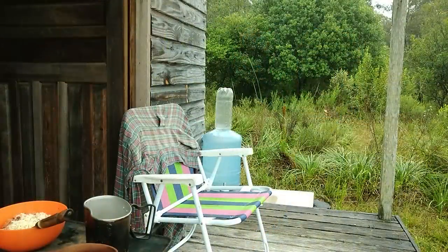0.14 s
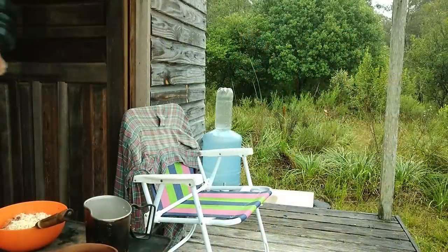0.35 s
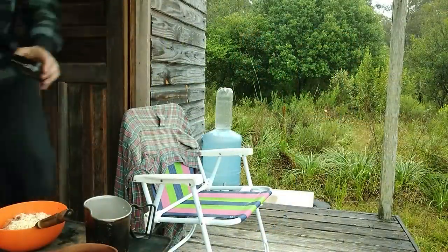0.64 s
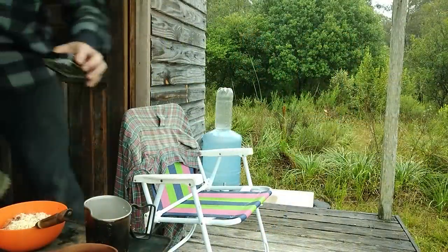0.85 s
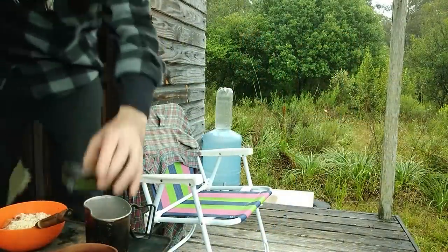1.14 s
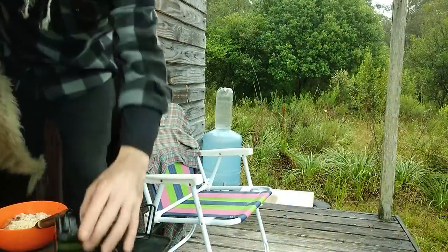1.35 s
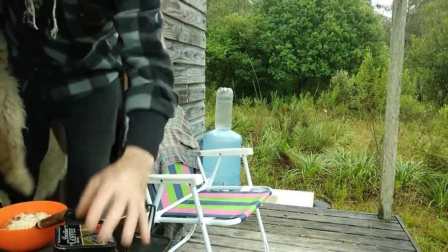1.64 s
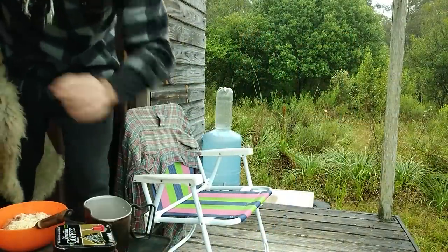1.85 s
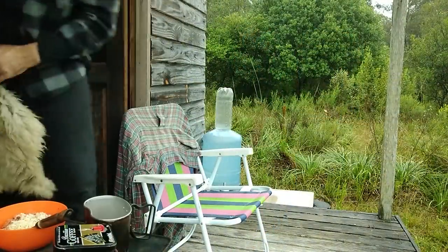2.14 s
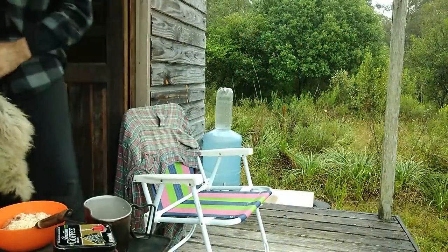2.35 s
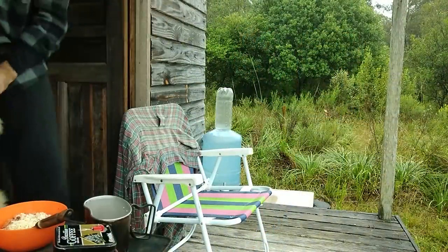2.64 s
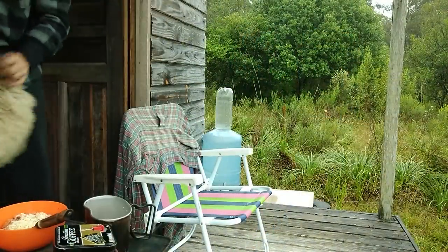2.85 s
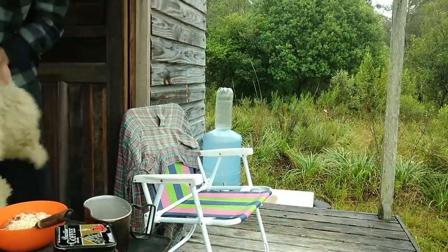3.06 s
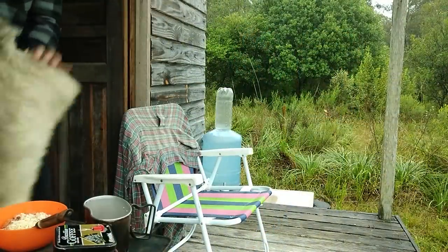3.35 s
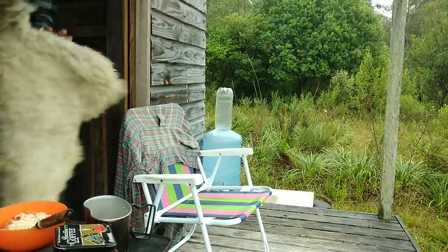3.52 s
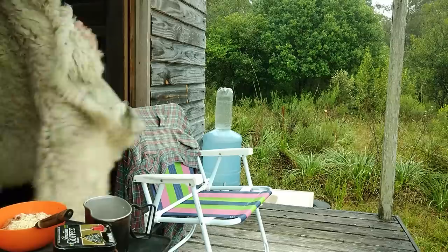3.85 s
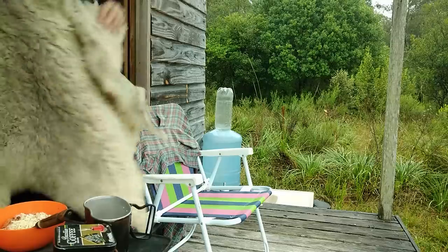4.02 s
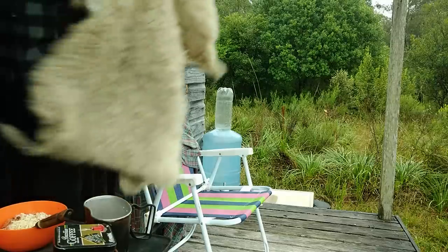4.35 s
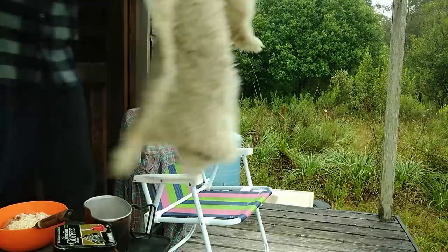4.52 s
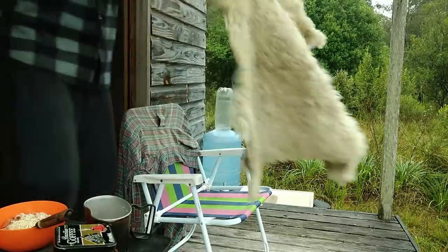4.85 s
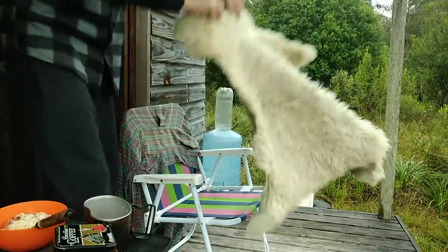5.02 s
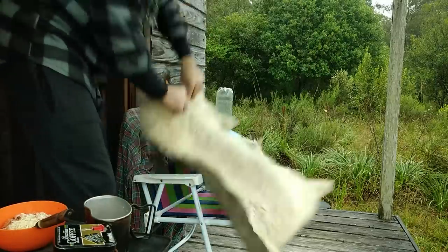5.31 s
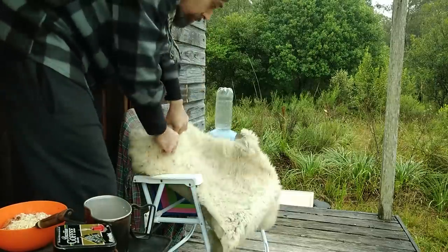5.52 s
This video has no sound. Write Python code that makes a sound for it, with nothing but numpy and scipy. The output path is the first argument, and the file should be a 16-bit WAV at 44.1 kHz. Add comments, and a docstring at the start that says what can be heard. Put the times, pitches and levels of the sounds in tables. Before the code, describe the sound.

Steady rain hisses on grass and leaves around a wooden porch, with fat drips, soft footsteps and one sharp clack of a small tin.

```python
"""Rain beside a wooden porch

Steady rain hisses on grass and bushes: shaped noise for the merged drops, random ticks and rings for near ones.
Fat drops splat as noise bursts, plop as bubbles rising in pitch, and plink on hollow things.
Someone steps softly over the boards (damped modes under soft blows), claps a small tin down on a table
(ringing modes with a noisy clack) and lays a fleece on a chair (short strokes of band noise)."""
import sys
import numpy as np
from scipy import signal
from scipy.fft import rfft, irfft, next_fast_len
from scipy.io import wavfile
from scipy.ndimage import map_coordinates

SR = 44100
rng = np.random.default_rng(int(sys.argv[2]) if len(sys.argv) > 2 else 0)


def output_pcm(signal):
    """Save a mono or channel-first signal as 16-bit PCM at the path in sys.argv[1].

    Samples are clipped to [-1, 1] before scaling.
    """
    pcm = np.clip(np.atleast_2d(signal).T, -1, 1) * 32767
    wavfile.write(sys.argv[1], SR, np.round(pcm).astype(np.int16))


N = 250488  # samples in the scene


def amp(db):
    """Level law: an amplitude gain is ten to the power dB / 20."""
    return 10 ** (np.asarray(db) / 20)


def unit(x):
    """Power normalization: scale a signal to rms 1."""
    return x / np.sqrt(np.mean(x ** 2) + 1e-20)


def seconds(length):
    """Sampling: the time axis of a sound that lasts this many samples."""
    return np.arange(length) / SR


def along(points, hz):
    """Logarithmic pitch scale: interpolate (Hz, value) points over log frequency."""
    f, v = np.transpose(points)
    return np.interp(np.log(hz + 1), np.log(f + 1), v)


def wobble(rate):
    """Band-limited fluctuation: a smooth curve through random knots, rate of them a second."""
    knots = rng.standard_normal(int(N * rate / SR) + 4)
    return map_coordinates(knots, [np.arange(N) * rate / SR])


def filtered(x, response):
    """Linear filtering: multiply the spectrum by a response given as a function of frequency."""
    n = x.shape[-1]
    m = next_fast_len(n + 8192)
    return irfft(rfft(x, m) * response(np.fft.rfftfreq(m, 1 / SR)), m)[..., :n]


def bump(hz, centre, octaves):
    """Resonance curve: a broad peak, falling to half at the given octaves from its centre."""
    return 1 / (1 + (np.log2((hz + 1) / centre) / octaves) ** 2)


def add(track, s, sound):
    """Superposition: mix a sound into a track from time s in seconds."""
    start = max(round(s * SR), 0)
    part = sound[..., :N - start]
    track[..., start:start + part.shape[-1]] += part


def from_right(pair, lag_ms):
    """Interaural delay: sound from the right reaches the left channel later; a negative lag means left."""
    return filtered(pair, lambda hz: np.exp(np.outer([-1, 1], 1j * np.pi * hz * lag_ms / 1000)))


# Left-right likeness of diffuse sound. Each row: frequency in Hz, correlation from 0 to 1.
LIKENESS = [(100, 0.96), (300, 0.95), (700, 1), (1500, 0.19), (4000, 0.12), (8000, 0.16), (14000, 0.12)]


def spread(pair, spectrum):
    """Diffuse-field coherence: mix two unrelated signals into a coloured, partly alike pair of rms 1."""
    def mid_side(hz):
        turn = np.arccos(np.clip(along(LIKENESS, hz), -1, 1)) / 2
        return amp(along(spectrum, hz)) * [np.cos(turn), np.sin(turn)]

    mid, side = filtered(pair, mid_side)
    return unit(np.array([mid + side, mid - side]))


def patter(count, size_db, tick_db, spray_t60):
    """Random arrivals: drops of uneven size, each a noise tick with a short spray; their powers add."""
    draw = rng.random((count, 2))
    size = amp(size_db * np.minimum(-np.log(1 - draw[:, 1]), 4))
    t = seconds(SR // 8)
    splash = amp(tick_db - 60 * t / 0.0032) + amp(-60 * t / spray_t60)
    hits = np.bincount((draw[:, 0] * N).astype(int), size ** 2, N)
    power = signal.fftconvolve(hits, splash ** 2)[:N]
    return unit(np.sqrt(np.abs(power)) * rng.standard_normal((2, N)))


# Leaves, grass and wood that the rain patters on. Each row: centre frequency in Hz, relative level in dB.
RAINED_SURFACES = [(700, -17), (1500, -12), (3000, -13.5), (4700, -9.5), (6300, -7), (7700, 1.5),
                   (8900, -6.5), (11500, -33.5)]


def leaves(octaves=0.54, surge_db=2.5):
    """Resonant colouring: every surface catches its own drops, in uneven flurries, and filters them."""
    out = np.zeros((2, N))
    for centre_hz, db in RAINED_SURFACES:
        hits = patter(count=800, size_db=3.5, tick_db=6, spray_t60=0.13) * amp(surge_db * wobble(11))
        out += amp(db) * unit(filtered(hits, lambda hz: bump(hz, centre_hz, octaves)))
    return spread(out, [(100, -2.0), (9000, 4), (16000, -1)])


# Spectrum of the far, merged rain. Each row: frequency in Hz, relative level in dB.
HISS_SPECTRUM = [(150, -28), (260, -7.5), (400, -2.5), (620, -2.5), (920, -1), (1600, -5.5), (2300, -6),
                 (3200, -9), (4500, -9.5), (6000, -6), (7900, 1), (10000, -11), (12500, -23), (16000, -36)]
# Spectrum of the low outdoor rumble. Each row: frequency in Hz, relative level in dB.
RUMBLE_SPECTRUM = [(13, -58), (22, -14), (39, -20), (60, 4), (173, -2.5), (205, -5.5), (258, -7.5),
                   (295, -6), (400, -12), (520, -56), (880, -120)]
# Spectrum of fine ticks on the deck. Each row: frequency in Hz, relative level in dB.
DECK_SPECTRUM = [(400, -43), (1500, -3), (3500, -9), (5500, -4), (7200, 2), (8400, 6), (10000, -9.5),
                 (12500, -27), (16000, -32)]
# nominal level of each layer, dB
HISS_DB, LEAVES_DB, DECK_DB, RUMBLE_DB, DROPLETS_DB = -42.3, -41, -49.5, -51.5, -53
SWELL_DB, SWELLS_PER_S = 0.73, 3  # the near patter slowly swells and sinks: depth, random knots a second


def rain():
    """Incoherent summation: far hiss, nearer patter on leaves, fine ticks on the deck and low rumble."""
    swell_db = SWELL_DB * wobble(SWELLS_PER_S)
    far = amp(HISS_DB + 0.62 * wobble(10)) * spread(rng.standard_normal((2, N)), HISS_SPECTRUM)
    near = amp(LEAVES_DB + swell_db) * leaves()
    ticks = patter(count=450, size_db=4.5, tick_db=9, spray_t60=0.081)
    deck = amp(DECK_DB + swell_db) * spread(ticks, DECK_SPECTRUM)
    rumble = amp(RUMBLE_DB + 0.73 * wobble(5.3)) * spread(rng.standard_normal((2, N)), RUMBLE_SPECTRUM)
    return from_right(far + near + deck + rumble, lag_ms=0.245) * amp([[-.4], [.4]])


def droplets(count=900, size_db=3, cycles=90):
    """Constant damping per cycle: each small drop rings at its own pitch and falls 60 dB in equal cycles."""
    draw = rng.random((count, 4))
    t = seconds(SR // 25)
    octaves = .3 * np.log(draw[:, :1] / (1 - draw[:, :1]))  # bell-shaped scatter of pitch
    hz = np.clip(6500 * 2 ** octaves, 900, 12000)
    size = amp(size_db * np.minimum(-np.log(1 - draw[:, 1:2]), 4))
    rings = size * np.sin(2 * np.pi * hz * t) * amp(-60 * hz * t / cycles)
    at = (draw[:, 2:3] * N).astype(int) + np.arange(len(t))
    place = np.pi / 2 * draw[:, 3:]  # panning angle, left to right
    sides = [np.bincount(at.ravel(), (rings * way(place)).ravel(), N)[:N] for way in (np.cos, np.sin)]
    return unit(np.array(sides))


# Soft knocks on the boards. Each row: start in seconds, nominal level in dB, brightness (upper corner) in Hz.
SOFT_KNOCKS = [(0.003, -31.5, 221), (0.371, -34.5, 199), (0.417, -28.5, 169), (0.897, -33.5, 540),
               (0.925, -37.5, 260), (2.144, -36, 298), (2.666, -30, 338), (2.687, -33.5, 280),
               (2.743, -37.5, 199), (4.445, -40.5, 430), (5.226, -39.5, 382), (5.289, -45.5, 130),
               (5.393, -34.5, 710)]
# Modes of the floor boards. Each row: frequency in Hz, relative level in dB.
BOARD_MODES = [(36, -1), (58, -13), (101, 9), (120, 5.5), (157, 0.5), (178, -4), (226, -1), (297, -10),
               (362, -14), (515, -8), (690, -21)]
# Scuff of the sole. Each row: frequency in Hz, relative level in dB per Hz.
SOLE_SPECTRUM = [(40, 0), (100, 10), (400, 0), (1200, -4), (4000, -5), (12000, -42)]
KNOCK_T60, BASS_CUT_SHARE = 0.25, 0.39  # s; the bass ends at this share of a knock's brightness


def knocks(scuff_db=-3, rise=0.0012, tap_db=-5, tap_t60=0.018, thud_db=2.5):
    """Modal excitation: soft blows tap and wake the boards; soft contacts are dull, bright ones lack bass."""
    out, t = np.zeros(N), seconds(SR // 2)
    for s, db, bright_hz in SOFT_KNOCKS:
        ring = 0
        for mode_hz, level in BOARD_MODES:
            ring = ring + amp(level + rng.normal(0, 1.8)) * np.sin(2 * np.pi * (mode_hz * t + rng.random()))
        scuff = unit(filtered(rng.standard_normal(len(t)), lambda hz: amp(along(SOLE_SPECTRUM, hz))))

        def contact(hz):
            treble_cut = np.hypot(1, (hz / bright_hz) ** 2)
            bass_cut = np.hypot(1, (BASS_CUT_SHARE * bright_hz / (hz + 1)) ** 2)
            return 1 / treble_cut / bass_cut

        thud = unit(filtered(unit(ring) + amp(scuff_db) * scuff, contact))
        thud = thud * amp(thud_db - 60 * t / KNOCK_T60) * (1 - np.exp(-t / rise))
        tap = unit(filtered(scuff, lambda hz: bump(hz, 2 * bright_hz, 0.63)))
        tap = tap * amp(tap_db - 60 * t / tap_t60)
        add(out, s, amp(db) * (thud + tap))
    return np.array([out, out])


# Fat drops off the roof edge. Each row: start in seconds, nominal peak in dB, pitch in Hz,
# level of the top fizz against the splat in dB.
FAT_DROPS = [(0.2511, -12, 8000, -3), (0.38, -16.5, 8100, -5), (0.452, -16.5, 6660, 3),
             (1.0566, -20, 8350, -23), (1.874, -20, 8060, -8), (2.342, -19, 9300, -22),
             (2.375, -13.5, 8000, -15), (3.014, -20, 7100, -9), (3.4368, -17, 7760, -14),
             (3.808, -17, 7700, -17), (4.144, -19, 7120, -15), (4.159, -5, 7130, -37),
             (4.1683, -11, 7250, -18), (4.2825, -16, 6300, -12), (4.8648, -22, 8100, 5),
             (5.116, -20.5, 7250, -12), (5.222, -16.5, 8500, -7)]
DRIP_LINE_DB = -4  # left minus right: the roof edge lies to the right


def drops(width=0.15, tick_t60=0.0091, spray_db=-11, spray_t60=0.15, fizz_t60=0.27, crest_db=8.5):
    """Two-stage decay: a sharp splat, then spray falling back; the top fizz has the longer tail."""
    out, t = np.zeros((2, N)), seconds(SR // 6)

    def shape(t60):
        return amp(-60 * t / tick_t60) + amp(spray_db - 60 * t / t60)

    for s, db, pitch_hz, fizz_db in FAT_DROPS:
        noise = spread(rng.standard_normal((2, len(t))), [(300, 4), (16000, -3)])
        splat = unit(filtered(noise, lambda hz: bump(hz, pitch_hz, width)))
        fizz = unit(filtered(noise, lambda hz: bump(hz, 9800, 1)))
        sound = splat * shape(spray_t60) + amp(fizz_db) * fizz * shape(fizz_t60)
        add(out, s, amp(db - crest_db) * sound / (1 + amp(fizz_db)))
    return from_right(out * amp([[DRIP_LINE_DB / 2], [-DRIP_LINE_DB / 2]]), lag_ms=0.27)


# Drips on hollow things. Each row: start in seconds, starting level in dB, pitch in Hz.
HOLLOW_DRIPS = [(0.451, -34.5, 2480), (0.836, -31, 3270), (3.812, -34, 5000), (3.997, -30, 2930),
                (4.159, -32, 4940)]
PLINK_T60 = .04  # s


def plinks(octaves=0.17):
    """Cavity resonance: a drip on something hollow rings it for a moment, as decaying band noise."""
    out, t = np.zeros((2, N)), seconds(SR // 8)
    for s, db, pitch_hz in HOLLOW_DRIPS:
        ring = unit(filtered(rng.standard_normal((2, len(t))), lambda hz: bump(hz, pitch_hz, octaves)))
        add(out, s, amp(db - 60 * t / PLINK_T60) * ring)
    return out


# Drops into standing water. Each row: start in seconds, nominal level in dB, starting pitch in Hz.
WATER_PLOPS = [(0.457, -41.5, 1615), (0.528, -39, 1580), (0.83, -47, 627), (0.905, -43, 1610),
               (1.16, -45.5, 930), (1.946, -47, 1590), (2.766, -38, 1585), (3.612, -44.5, 480),
               (4.238, -40, 2940), (4.41, -42, 2770), (4.691, -44, 1565), (5.173, -42.5, 686)]
# a 1 kHz bubble lives and rises like this; bigger, lower ones live longer and rise faster
BUBBLE_S, RISE_OCTAVES_PER_S = 0.034, 12
LIFE_GROWS, RISE_GROWS = 0.48, 1.6  # powers of the bubble's size


def plops(rough=0.68):
    """Bubble resonance: trapped air rings, rising in pitch near the surface; size sets life and rise."""
    out, t = np.zeros(N), seconds(SR // 12)
    for s, db, start_hz in WATER_PLOPS:
        size = 1000 / start_hz  # relative to a 1 kHz bubble
        life = BUBBLE_S * size ** LIFE_GROWS
        rise = RISE_OCTAVES_PER_S * size ** RISE_GROWS
        phase = 2 * np.pi * np.cumsum(start_hz * 2 ** (rise * t)) / SR
        slosh = unit(filtered(rng.standard_normal((2, len(t))), lambda hz: np.exp(-(hz / 220) ** 2)))
        # slow noise roughens both strength and phase
        ring = (1 + rough * slosh[0]) * np.sin(phase) + rough * slosh[1] * np.cos(phase)
        add(out, s, amp(db) * ring * np.sin(np.pi * np.minimum(t / life, 1) ** 0.44))
    return from_right(np.array([out, out]), lag_ms=0.12)


# Brushes of sleeves and fleece. Each row: start in seconds, nominal level in dB, centre frequency in Hz.
FABRIC_BRUSHES = [(1.152, -46.5, 1810), (1.375, -47, 1100), (2.755, -44, 2240), (3.365, -45.5, 1790),
                  (4.61, -46.5, 770), (5.34, -43.5, 460), (5.482, -45, 746), (5.629, -47.5, 750)]
BRUSH_S = 0.062  # length of one stroke


def cloth(octaves=1.0):
    """Friction noise: fabric slides over fabric in short soft strokes of band noise."""
    out, t = np.zeros(N), seconds(SR // 6)
    stroke = np.sin(np.pi * np.sqrt(np.minimum(t / BRUSH_S, 1)))
    for s, db, centre_hz in FABRIC_BRUSHES:
        rub = unit(filtered(rng.standard_normal(len(t)), lambda hz: bump(hz, centre_hz, octaves)))
        add(out, s, amp(db) * rub * stroke)
    return np.array([out, out])


# The tin lands and rocks flat. Each row: start in seconds, ring level in dB, clack level in dB,
# swell time of the ring in seconds.
TIN_CONTACTS = [(1.4631, -32, -3, .002), (1.4656, -15, -14, 0.0016), (1.4998, -32.5, -47, 0.00082),
                (1.5235, -31.5, -60, 0.0022)]
# Modes of tin and table top. Each row: frequency in Hz, relative level in dB, 60 dB decay time in seconds.
TIN_AND_TABLE_MODES = [(137, -21.5, 0.44), (226, -23, 0.36), (349, -10.5, 0.112), (442, -20.5, 0.11),
                       (531, 0, 0.13), (583, -5, 0.16), (680, -6.5, 0.15), (743, -7, 0.089), (830, 6, 0.1),
                       (879, 2, 0.099), (916, 0, 0.065), (1043, -4, 0.12), (1115, -5, 0.076),
                       (1249, -9, 0.067), (1620, -10, 0.15), (1790, -11, 0.1), (2120, -5, 0.069),
                       (2720, -8.5, 0.082), (2750, -6, 0.097)]
# Clack of the thin metal. Each row: frequency in Hz, relative level in dB per Hz.
CLACK_SPECTRUM = [(150, -24), (400, -28), (1000, -12), (1500, -19), (3000, -14), (4000, -18.5),
                  (5800, -9.5), (6700, -10), (7600, -4), (8800, -5), (10000, -20.5), (16000, -33)]
TIN_STILL = 1.538  # s, pressed flat by the hand


def tin(clack_t60=0.076, rise=0.00054, pressed_t60=0.026):
    """Damped modes: contacts clack the thin metal and ring tin and table top, until the hand damps them."""
    out, t = np.zeros((2, N)), seconds(SR // 2)
    for s, ring_db, clack_db, swell in TIN_CONTACTS:
        ring = 0
        for k, (hz, level, t60) in enumerate(TIN_AND_TABLE_MODES):
            decay = amp(level + rng.normal(0, 0.98) - 60 * t / t60)
            # neighbouring modes swing in opposite directions
            ring = ring + (-1) ** k * decay * np.sin(2 * np.pi * hz * t)
        ring = amp(ring_db) * ring * (1 - np.exp(-t / swell))
        clack = spread(rng.standard_normal((2, len(t))), CLACK_SPECTRUM) * amp(-60 * t / clack_t60)
        clack = amp(clack_db) * clack * (1 - np.exp(-t / rise))
        add(out, s, ring + clack)
    pressed = amp(-60 * np.clip(seconds(N) - TIN_STILL, 0, .5) / pressed_t60)
    return from_right(out * pressed * amp([[1.3], [-1.3]]), lag_ms=-0.22)  # the table stands to the left


# Reverberation of the porch. Each row: frequency in Hz, 60 dB decay time in seconds.
PORCH_DECAY = [(100, 0.71), (500, 0.12), (2000, 0.23), (8000, 0.081), (15000, 0.058)]


def porch(x):
    """Reverberation: wall, roof and deck answer briefly with decaying noise, the bass longest."""
    hz, t, z = signal.stft(rng.standard_normal((2, SR // 2)), SR, nperseg=256)
    decay = amp(-60 * t / along(PORCH_DECAY, hz)[:, None])
    tail = signal.istft(z * decay, SR, nperseg=256)[1]
    return signal.fftconvolve(x, tail / np.linalg.norm(tail[0]), axes=1)[:, :N]


def scene():
    """Direct and reverberant sound: rain all around, with the near sounds answered by the porch."""
    outdoors = rain() + amp(DROPLETS_DB) * from_right(droplets(), lag_ms=0.27)
    person = knocks() + cloth()
    water = drops() + plinks() + plops()
    clap = tin()
    echo = porch(amp(-8.0) * water + amp(-22.0) * person + amp(-16.0) * clap)
    return outdoors + water + person + clap + echo


TOP_HZ = 15900  # band limit


def record(dry):
    """Overload and band limiting: peaks beyond full scale clip; nothing is kept above the band limit."""
    return filtered(np.clip(dry, -1, 1), lambda hz: hz < TOP_HZ)


dry = scene()
out = record(dry)
output_pcm(out)
```